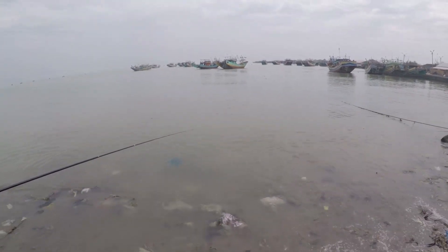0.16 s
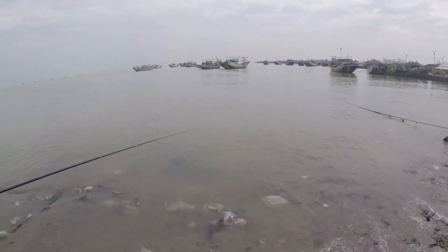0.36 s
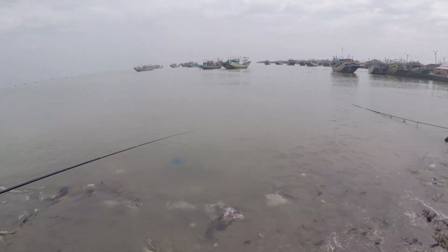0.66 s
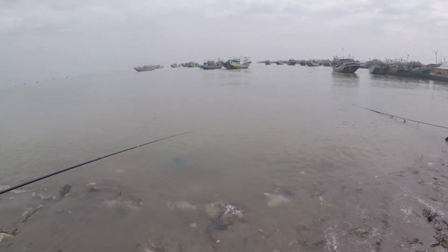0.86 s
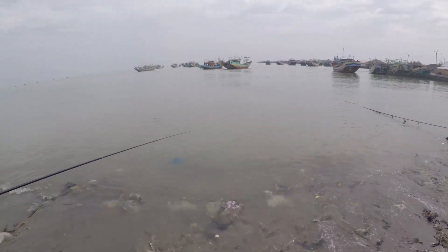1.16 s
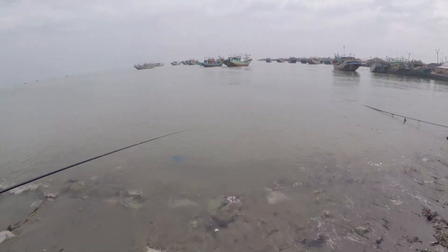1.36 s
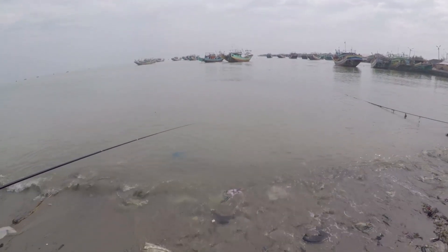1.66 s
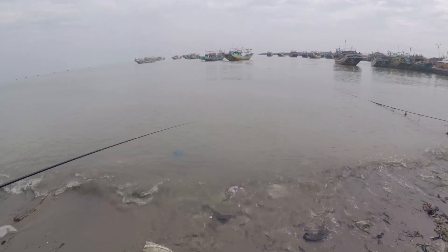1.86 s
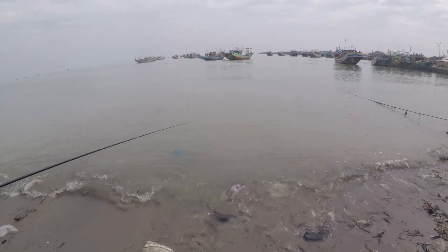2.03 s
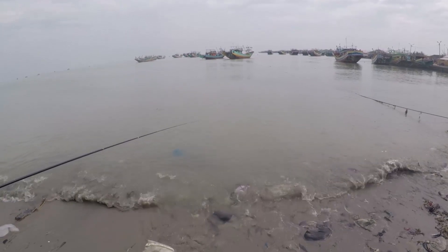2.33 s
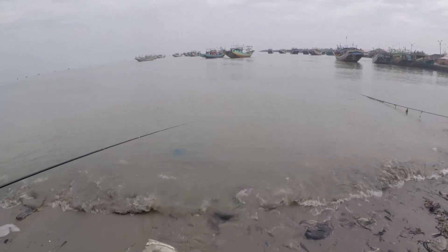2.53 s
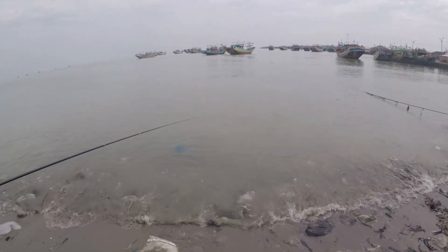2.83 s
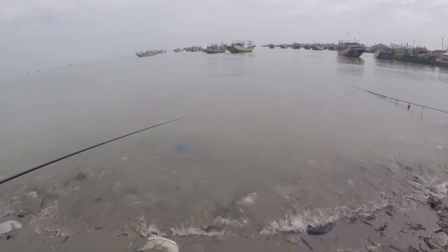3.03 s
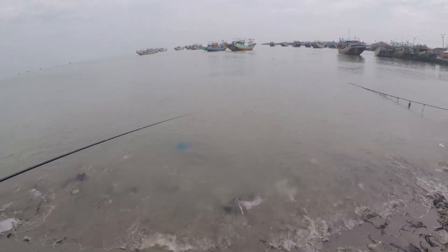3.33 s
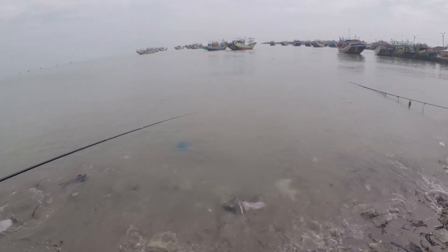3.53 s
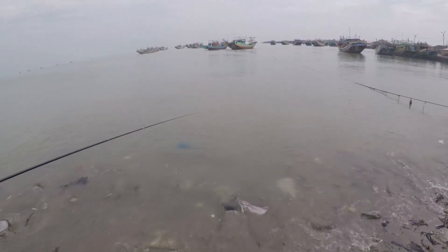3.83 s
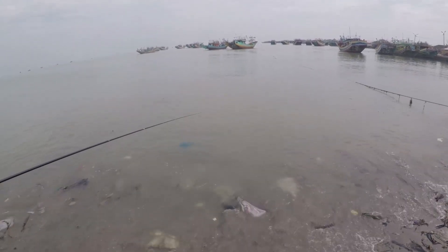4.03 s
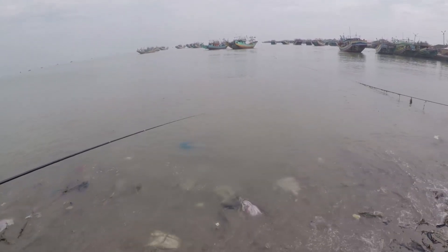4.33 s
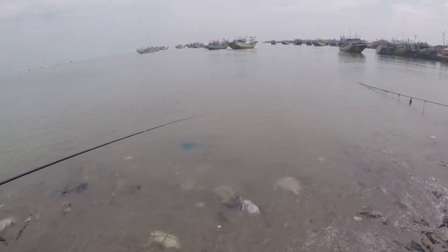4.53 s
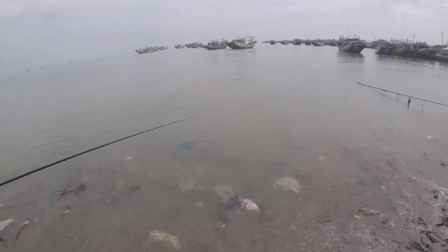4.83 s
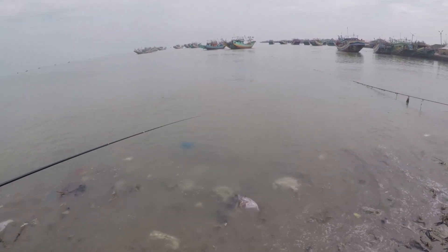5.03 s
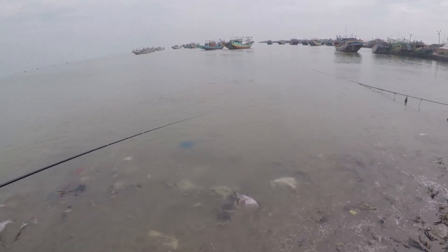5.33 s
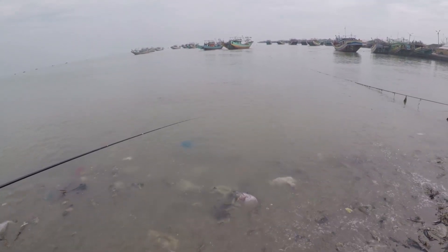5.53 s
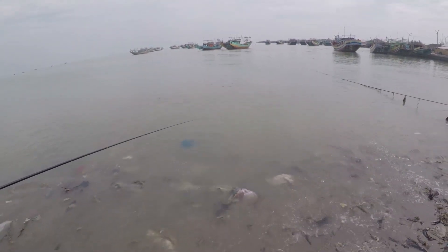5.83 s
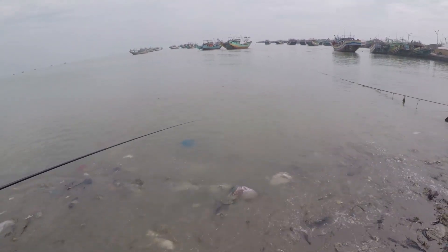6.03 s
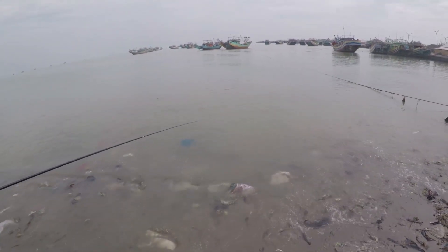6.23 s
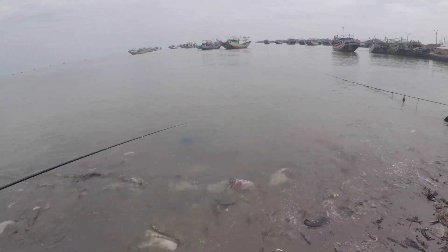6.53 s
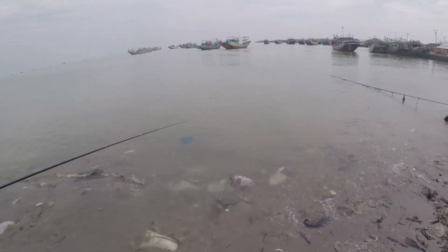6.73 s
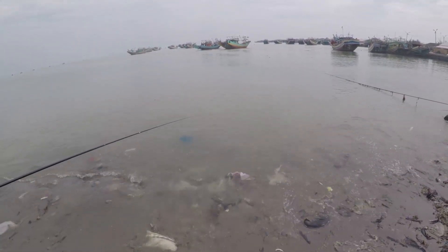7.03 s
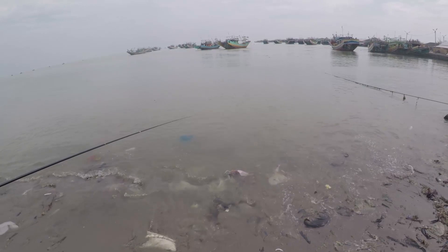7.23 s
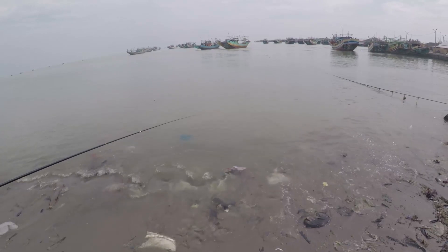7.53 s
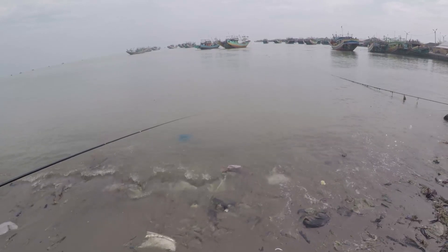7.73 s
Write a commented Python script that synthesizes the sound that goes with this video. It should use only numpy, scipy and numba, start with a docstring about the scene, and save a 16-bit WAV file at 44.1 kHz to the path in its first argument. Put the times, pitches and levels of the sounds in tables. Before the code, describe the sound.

Wind rumbles over a low, gradually slowing diesel chug as a little wave gathers, breaks in bubbles and spray, and drains across crackling mud.

```python
"""A muddy harbour shore: pulses and gas puffs excite a diesel exhaust, whose thud slows gradually throughout.
Wind, made of coloured noise, buffets the microphone from the start, with one strong blast in the first second.
A small gathering wave breaks in bubbles, hiss and spray, then drains; near drops ping and the mud crackles.
In the lull a far bird, a fluttering sine, peeps once; then the next wave gathers, still unbroken at the end.
Steady noise gives the hiss of ripples along the shore, and engine and wind dip once late on."""
import sys
import numpy as np
from scipy import signal
from scipy.fft import rfft, irfft
from scipy.io import wavfile
from scipy.ndimage import uniform_filter1d
from numba import njit

SR = 44100
rng = np.random.default_rng(int(sys.argv[2]) if len(sys.argv) > 2 else 0)


def to_wav(sig):
    """Store sig (one row per channel, or 1-D mono) as 16-bit WAV at the path in sys.argv[1].

    Samples outside -1..1 are clipped; the rate is SR.
    """
    pcm = np.clip(np.atleast_2d(sig), -1, 1) * 32767
    pcm = np.round(pcm).astype(np.int16)
    wavfile.write(sys.argv[1], SR, pcm.T)  # frames by channels


N = 347331
TIME = np.arange(N) / SR
FREQ = np.maximum(np.fft.rfftfreq(N, 1 / SR), 1e-3)


def undb(db):
    """Logarithmic level: decibels to amplitude gain."""
    return 10 ** (np.asarray(db) / 20)


def unit(x):
    """Normalization: scale to an rms of 1."""
    return x / np.sqrt(np.mean(x ** 2))


def curve(points):
    """Linear interpolation: join (s, value) points into a control over time."""
    return np.interp(TIME, *np.transpose(points))


def noise():
    """White noise: equal power at all frequencies."""
    return rng.standard_normal(N)


def walk(rate_hz):
    """Slow random modulation: levels drawn rate_hz times a second, joined by slopes; rms 1."""
    hold = int(SR / rate_hz)
    levels = rng.standard_normal(N // hold + 1)
    return unit(uniform_filter1d(np.repeat(levels, hold), hold)[:N])


def colour(x, points):
    """Linear filtering: shape a spectrum by (Hz, dB) points joined on a log frequency axis."""
    hz, db = np.transpose(points)
    return irfft(rfft(x) * undb(np.interp(np.log(FREQ), np.log(hz), db)), N)


def resonate(x, modes):
    """Modal resonance: sum steep-sided (Hz, width Hz, dB) modes; neighbours swing in opposite phase."""
    response = 0
    for k, (hz, width, db) in enumerate(modes):
        one_stage = 1 / (1 + 1j * (FREQ / hz - hz / FREQ) * hz / width)
        response = response + (-1) ** k * undb(db) * one_stage ** 2
    return irfft(rfft(x) * response, N)


@njit
def ring(start_s, pitch_hz, t60_s, size, rise):
    """Damped oscillation: add sines whose pitch climbs by the share rise while they decay by 60 dB."""
    out = np.zeros(N)
    for k in range(len(start_s)):
        first, length = int(start_s[k] * SR), int(t60_s[k] * SR) + 1
        step = 2j * np.pi * pitch_hz[k] / SR
        phasor = size[k] + 0j
        turn = np.exp(step - np.log(1000) / length)
        glide = np.exp(step * rise / length)
        for i in range(max(first, 0), min(first + length, N)):
            phasor *= turn
            turn *= glide
            out[i] += phasor.imag
    return out


def bubbles(count, low_hz, high_hz, cycles, spread_db, rise):
    """Bubble resonance: small ones ring higher and shorter, a few are much louder than the rest."""
    when, pitch, life, luck = rng.random((count, 4)).T
    hz = low_hz * (high_hz / low_hz) ** pitch
    size = undb(-spread_db * np.log(np.maximum(luck, 1 / 300))) * hz
    t60_s = cycles * (.5 + life) / hz
    return unit(ring(when * N / SR, hz, t60_s, size, rise))


# mean engine speed, about which the governor hunts: time_s, firing_rate_hz [firings per second]
FIRING_RATE = [(0.0, 26.73), (.38, 26.45), (.75, 26.39), (1.13, 26.58), (1.88, 26.24), (2.63, 26.21),
               (3.05, 26.1), (3.75, 25.42), (4.5, 24.4), (5.25, 22.85), (6.0, 22.5), (6.75, 21.9),
               (7.88, 20.33)]
# exhaust resonances of boom and bark: pitch_hz, width_hz [of one filter stage], level_db [relative]
BOOM_MODES = [(39.5, 39, -5.5), (80.7, 19, 1), (107.6, 15.3, -10.5)]
BARK_MODES = [(280.3, 42, 1.5), (321.6, 36, -6.5), (363, 40.5, -4.5), (522.5, 41, -20.5)]
# three groups of exhaust resonances, low, middle and high hum: pitch_hz, width_hz, level_db [as above]
HUM_MODES = [
    [(137, 72, -12.5), (154.25, 23.8, -2)],
    [(179.1, 39, 0)],
    [(213.7, 32.7, 0), (230, 25.8, -1)],
]
# loudness of each exhaust band before its trim: time_s, level_db
BOOM_LEVEL = [(0, -30), (1.1, -29.5), (1.6, -19), (3.3, -24.5), (4.4, -17.5), (4.9, -23), (6.9, -32.5),
              (7.35, -17), (7.88, -32)]
LOW_HUM_LEVEL = [(0, -37), (.3, -22), (2.6, -22.5), (3.5, -31.5), (4.5, -23), (5.4, -27), (5.9, -20.5),
                 (6.65, -28.5), (7.0, -20.5), (7.88, -19)]
MIDDLE_HUM_LEVEL = [(0, -35.5), (1.9, -28.5), (2.6, -22.5), (4.1, -27.5), (5.6, -21), (6.0, -29.5),
                    (7.1, -18.5), (7.88, -22)]
HIGH_HUM_LEVEL = [(0, -20), (.4, -20.5), (.7, -25), (1.5, -24.5), (2.2, -20.5), (3.65, -32.5), (4.1, -22),
                  (4.6, -28.5), (5.0, -25.5), (6.3, -29), (7.1, -23.5), (7.88, -30.5)]
BARK_LEVEL = [(0, -41), (1.0, -38), (1.35, -30), (2.1, -28.5), (4.0, -38), (4.8, -33.5), (7.88, -36)]
# turbulent gas in each thud: share at the starting speed, and its growth for each Hz that the engine slows
ROUGH_SHARE, ROUGH_PER_HZ = .24, 0.046


def engine(start_turn=0.2532, puff_share=1.0, boom_trim_db=-1, bark_trim_db=-1, boom_gas=0.16, bark_gas=0.73):
    """Source and resonator: each firing sends a pulse and a gas puff into the exhaust; slowing roughens it."""
    rate_hz = curve(FIRING_RATE)
    slowed_hz = rate_hz[0] - rate_hz
    # the governor hunts a little, and no two firings are equally strong
    turns = start_turn + np.cumsum(rate_hz * (1 + .005 * walk(6))) / SR
    firings = np.flatnonzero(np.diff(np.floor(turns)))
    pulses = np.zeros(N)
    pulses[firings] = undb(rng.standard_normal(len(firings)))
    # each puff decays over the cycle: puff_share is its 1/e time in cycles
    gas = unit(noise() * np.exp(-(turns % 1) / puff_share))
    drive = unit(pulses) + (ROUGH_SHARE + ROUGH_PER_HZ * slowed_hz) * gas

    boom = unit(resonate(drive + boom_gas * gas, BOOM_MODES)) * undb(curve(BOOM_LEVEL) + boom_trim_db)
    hum = np.zeros(N)
    for k, level in enumerate((LOW_HUM_LEVEL, MIDDLE_HUM_LEVEL, HIGH_HUM_LEVEL)):
        # neighbouring bands have opposite phase
        hum += (-1) ** k * undb(curve(level)) * unit(resonate(drive, HUM_MODES[k]))
    bark = unit(resonate(drive + bark_gas * gas, BARK_MODES))
    # an echo across the harbour, 56 ms late, blurs the bark of each firing
    echo = np.interp(TIME - .056, TIME, bark)
    bark = unit(bark + 0.6 * echo) * undb(curve(BARK_LEVEL) + bark_trim_db)
    return boom + hum + bark


# waves: break_s, level_db [full swash, before drain and wash gain]; the second still gathers at the end
WAVES = [(2.55, -38.1), (8.62, -39)]
# the swash starts well ahead of the break, builds up with a 1/e time and drains after it
LEAD_S, GATHER_S, DRAIN_DB_PER_S = 2.806, 0.97, 5
# the breaking crest climbs to a level over the full swash and collapses; its spray lingers slightly longer
CREST_RISE_DB_PER_S = 13.5
CREST_DB, CREST_FALL_S = 8, 1
SPRAY_CREST_DB, SPRAY_FALL_S = 7.5, 1.06


def surf_db(crest_db, fall_s):
    """Power summation of swash and crest: each wave gathers, breaks in a short crest and drains away."""
    power = 1e-9
    for break_s, level_db in WAVES:
        before, after = np.maximum(break_s - TIME, 0), np.maximum(TIME - break_s, 0)
        gathering = 1 - np.exp(-np.maximum(LEAD_S - before, 0) / GATHER_S)
        swash = gathering * undb(-DRAIN_DB_PER_S * after)
        crest = undb(crest_db - CREST_RISE_DB_PER_S * before) * np.exp(-(after / fall_s) ** 2)
        power = power + undb(level_db) ** 2 * (swash ** 2 + crest ** 2)
    return 10 * np.log10(power)


# spectrum of the broken water: pitch_hz, level_db [relative]
WASH_SPECTRUM = [(250, -0.5), (430, -2), (560, 0.5), (760, -5.5), (970, -4), (1250, -6.5), (1430, -5),
                 (1700, -9), (2200, -9.5), (2600, -13), (3700, -13), (6200, -19), (7300, -26.5),
                 (9300, -29.5), (11700, -39), (15000, -38.5)]


def waves(wash_db=2.8, spray_db=1.1, split_hz=2400, churn_db=0.5, surge_db=0.63):
    """Bubble resonance: large bubbles gurgle in the wave front; fine ones fizz in foam over the mud."""
    body_level_db = surf_db(CREST_DB, CREST_FALL_S)
    spray_level_db = surf_db(SPRAY_CREST_DB, SPRAY_FALL_S) + spray_db
    gurgle = bubbles(count=9000, low_hz=380, high_hz=3000, cycles=40, spread_db=2.4, rise=.06)
    fizz = bubbles(count=30000, low_hz=2500, high_hz=15000, cycles=26, spread_db=2.6, rise=.05)
    grains = unit(colour(0.48 * gurgle + fizz, WASH_SPECTRUM))
    hiss = unit(colour(noise(), WASH_SPECTRUM))
    # in a breaking wave so many bubbles sound at once that they merge into a hiss
    merged = np.interp(body_level_db, [-48, -32], [.3, .62])
    water = np.sqrt(merged) * hiss + np.sqrt(1 - merged) * grains
    # split into a low-passed body and the spray above it
    body = irfft(rfft(water) / (1 + (FREQ / split_hz) ** 4), N)
    spray = (water - body) * undb(spray_level_db)
    body = body * undb(body_level_db + churn_db * walk(26))
    return (body + spray) * undb(wash_db + surge_db * walk(14) + 0.57 * walk(45))


# spectrum of the wind pressure: pitch_hz, level_db [relative]
BUFFET_SPECTRUM = [(8, -6.5), (22, -5), (42, 1), (65, -4.5), (100, -6), (150, -9), (250, -19), (450, -40.5),
                   (1000, -87)]
# strength of the breeze before the wind trim: time_s, level_db
BREEZE = [(0, -16), (1.0, -15.5), (1.8, -23.5), (3.2, -17.5), (6.1, -18.5), (6.9, -21.5), (7.88, -19.5)]
# gusts over the breeze: peak_s, half_length_s [to 1/e], level_db [peak, before the wind trim]
GUSTS = [(0.0, 0.055, -8.5), (0.67, 0.26, -15.5), (1.56, 0.051, -14), (2.26, .06, -14), (3.046, 0.13, -15),
         (3.89, 0.076, -19), (6.202, 0.15, -17), (6.654, 0.1, -16), (7.38, 0.045, -18)]


def wind(trim_db=-1, eddy_db=0.33, blast_s=0.78, blast_length_s=0.16, blast_db=-18):
    """Turbulent pressure: eddies press on the microphone port; one strong blast reaches the low mids."""
    gusts = sum(undb(db) * np.exp(-((TIME - s) / length) ** 2) for s, length, db in GUSTS)
    strength = np.hypot(undb(curve(BREEZE)), gusts)
    rumble = unit(colour(noise(), BUFFET_SPECTRUM)) * strength * undb(trim_db + eddy_db * walk(20))
    blast = unit(resonate(noise(), [(105, 33, 0)])) * np.exp(-((TIME - blast_s) / blast_length_s) ** 2)
    return rumble + undb(blast_db) * blast


def level_dip(at_s=6.775, length_s=0.073, dip_db=-5):
    """Amplitude modulation: a gain that dips briefly once."""
    return undb(dip_db * np.exp(-((TIME - at_s) / length_s) ** 4))


# single drops and bursting bubbles near by: start_s, level_db [peak], pitch_hz [at onset], t60_s
DROPS = [(.097, -30.5, 1240, 0.026), (.818, -39, 6060, .029), (1.226, -35.5, 6970, .021),
         (1.305, -46, 14000, .012), (1.499, -33, 8750, .006), (3.055, -31, 4600, .015),
         (3.246, -26, 2750, .025), (3.865, -35, 4470, .01), (4.091, -38, 1550, .069),
         (4.32, -37, 4000, .012), (4.476, -40, 10500, .004), (4.63, -39, 1880, .05),
         (4.84, -50, 5770, 0.022), (5.86, -38, 1740, .03), (6.07, -46, 2350, .068),
         (6.438, -40, 10000, .004), (6.476, -40.5, 6900, .02), (6.825, -43, 7200, .02),
         (6.996, -31.5, 5200, .013), (7.237, -40, 10500, .004), (7.365, -31, 7300, 0.0041),
         (7.505, -38, 4350, .032)]


def drops(crackle_db=-64):
    """Damped oscillation: near drops ping; wet mud crackles with tiny bursting bubbles, more under a wave."""
    start_s, level_db, pitch_hz, t60_s = np.transpose(DROPS).copy()
    pings = ring(start_s, pitch_hz, t60_s, undb(level_db), 0.043)
    wave_db = surf_db(CREST_DB, CREST_FALL_S)
    crackle = bubbles(count=1100, low_hz=1500, high_hz=13000, cycles=30, spread_db=3.6, rise=.04)
    crackle = unit(colour(crackle, [(1500, 0), (6000, -5), (13000, -17)]))
    # the crackle follows half of the wave's swing in dB
    return pings + undb(crackle_db + .5 * (wave_db - wave_db.mean())) * crackle


def bird(at_s=5.16, length_s=.055, pitch_hz=1890, fall_per_s=.25, peep_db=-47):
    """Frequency and amplitude modulation: one faint, slightly falling far peep, fluttering in the wind."""
    since = np.clip(TIME - at_s, -.5, .5)
    hz = pitch_hz * (1 - fall_per_s * since + .005 * walk(120))
    tone = np.sin(2 * np.pi * np.cumsum(hz) / SR)
    return undb(peep_db + 3 * walk(60)) * np.exp(-(since / length_s) ** 2) * tone


# spectrum of the distant ripples: pitch_hz, level_db [relative]
HARBOUR_SPECTRUM = [(200, -17.5), (430, -1.5), (520, -1.5), (800, -1.5), (1100, -7), (1450, -5),
                    (2200, -11.5), (4000, -20.5), (6000, -24), (7200, -24.5), (9500, -23), (12000, -33.5),
                    (15000, -45)]


def harbour(level_db=-46.3):
    """Incoherent summation: ripples all along the shore blend into a smooth hiss."""
    return unit(colour(noise(), HARBOUR_SPECTRUM)) * undb(level_db + .5 * walk(11))


def scene():
    """Superposition: everything meets at one microphone in the open air; engine and wind share the dip."""
    mix = (engine() + wind()) * level_dip() + waves() + drops() + bird() + harbour()
    return mix[None]


def record(dry, ceiling=0.78, top_hz=15250):
    """Saturation and band limiting: the camera rounds the largest bass swings and cuts the top."""
    bass = signal.sosfiltfilt(signal.butter(4, 400, fs=SR, output="sos"), dry)
    excess = ceiling * np.tanh(bass / ceiling) - bass
    # keep the distortion products low
    rounding = signal.sosfiltfilt(signal.butter(4, 260, fs=SR, output="sos"), excess)
    return signal.sosfilt(signal.ellip(10, .2, 80, top_hz, fs=SR, output="sos"), dry + rounding)


dry = scene()
out = record(dry)
to_wav(out)
```